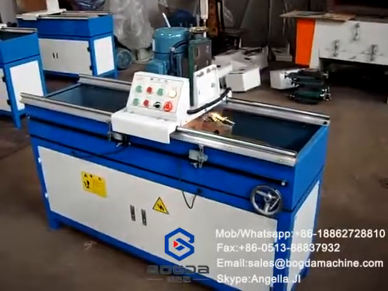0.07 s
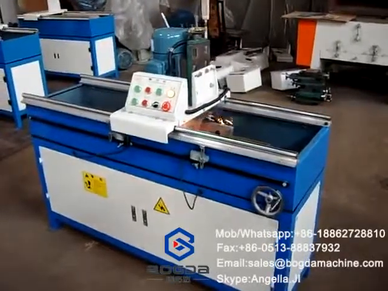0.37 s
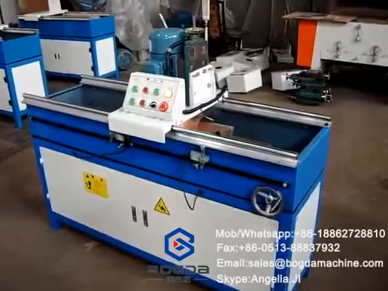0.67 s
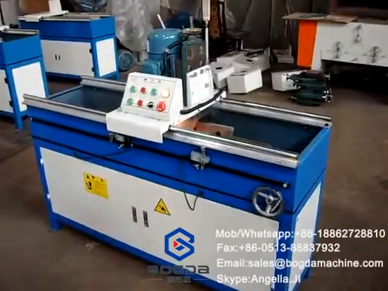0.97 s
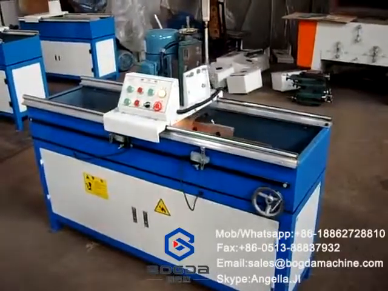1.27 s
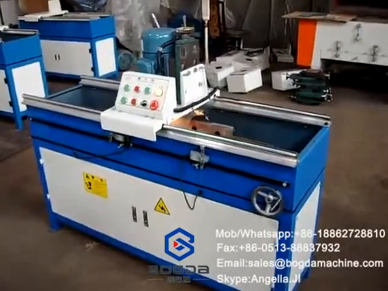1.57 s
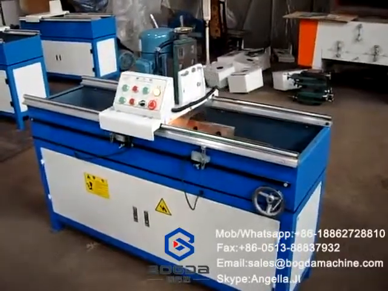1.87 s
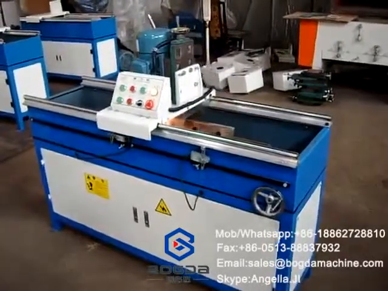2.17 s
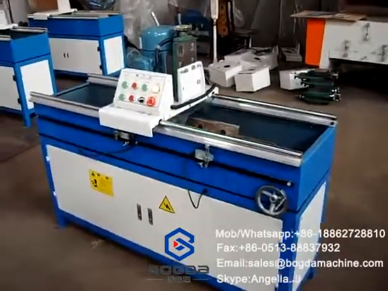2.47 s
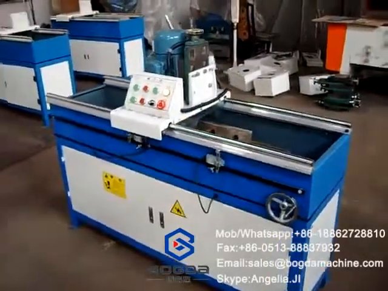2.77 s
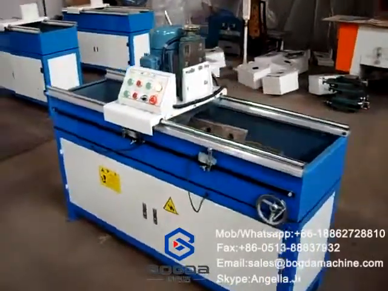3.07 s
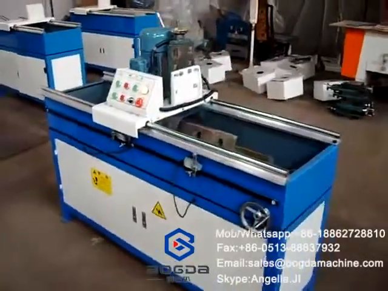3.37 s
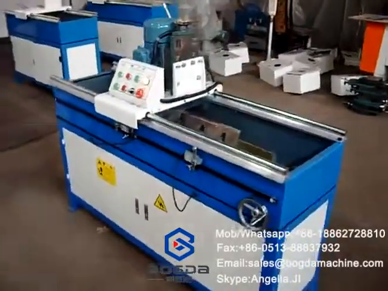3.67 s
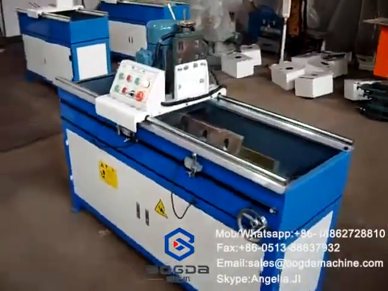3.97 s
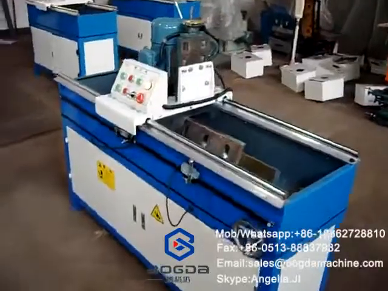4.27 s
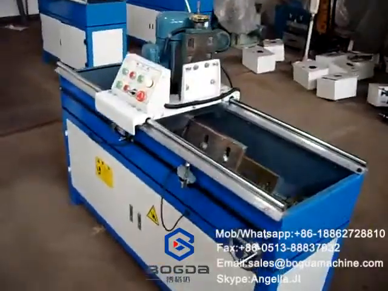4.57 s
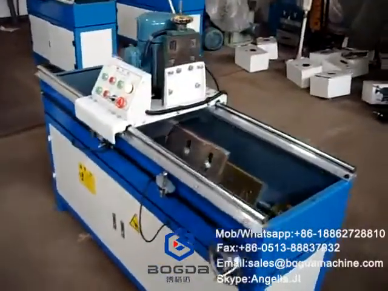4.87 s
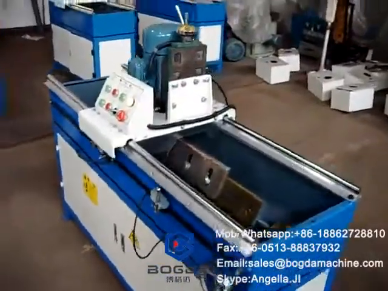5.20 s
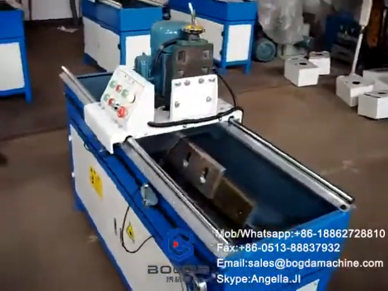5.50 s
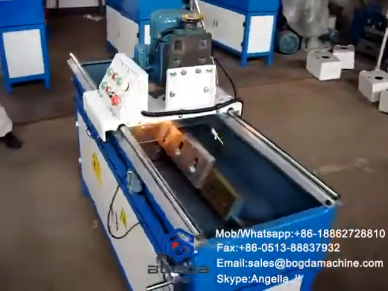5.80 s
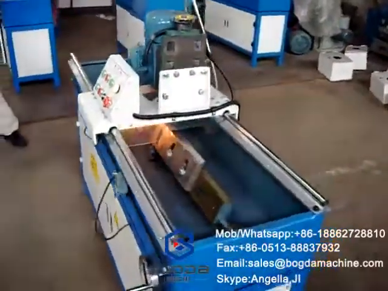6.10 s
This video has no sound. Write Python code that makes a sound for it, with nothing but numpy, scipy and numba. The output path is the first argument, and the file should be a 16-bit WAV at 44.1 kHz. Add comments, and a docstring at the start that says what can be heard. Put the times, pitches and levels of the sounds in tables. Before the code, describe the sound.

A motorised grinding wheel rubs along a long steel blade with a loud buzzing rasp and a high squeal. The squeal sinks in pitch as the wheel runs off the end. The motor then spins free with a hissing whirr, a bright rattle and irregular metal clacks. Near the end the wheel bites again and the squeal climbs. It is heard from nearby, over a soft workshop rumble.

```python
"""First comes a buzzing rasp with a high squeal: a knife grinder's wheel rubs along a long steel blade.
The same grit comes round on every turn, which makes the buzz, and the wheel chatters, which makes the
squeal. The squeal sinks as the wheel nears the blade's springy end and runs off it. The motor head then
spins free with a hiss, a bright rattle and clacks, until the wheel bites again and the squeal climbs.
The workshop rumbles softly underneath."""
import sys
import numpy as np
from scipy import signal
from scipy.fft import rfft, irfft
from scipy.io import wavfile
from scipy.ndimage import uniform_filter1d, map_coordinates
from numba import njit

SR = 44100
rng = np.random.default_rng(int(sys.argv[2]) if len(sys.argv) > 2 else 0)


def store_wav(level_fs):
    """Save 16-bit WAV to argv[1]."""
    pcm = np.round(np.clip(np.atleast_2d(level_fs), -1, 1) * 32767)
    wavfile.write(sys.argv[1], SR, pcm.T.astype(np.int16))


N = 270774
T = np.arange(N) / SR


def undb(db):
    """Turn decibels into a number to multiply by."""
    return 10 ** (np.asarray(db) / 20)


def unit(x):
    """Scale a signal to an average strength (rms) of 1."""
    return x / np.sqrt(np.mean(x ** 2))


def steady(x, samples):
    """Hold a signal's strength near 1, averaging over this many samples."""
    return x / np.sqrt(uniform_filter1d(x ** 2, size=samples) + 1e-12)


def curve(table):
    """Join (seconds, value) rows with straight lines."""
    return np.interp(T, *np.transpose(table))


def wander(per_s):
    """A smooth random wobble, about 1 in size."""
    hold = int(SR / per_s)
    steps = np.repeat(rng.standard_normal(N // hold + 1), hold)
    return unit(uniform_filter1d(uniform_filter1d(steps, hold), hold)[:N])


def bump(turns, place, width):
    """A smooth push at one place in every turn."""
    return np.exp(-.5 * (((turns - place + .5) % 1 - .5) / width) ** 2)


def colour(x, points, size=4096):
    """Shape a sound's bass and treble to follow (Hz, dB) points."""
    hz, db = np.transpose(points)
    bins_hz = np.arange(size // 2 + 1) * SR / size
    gain = undb(np.interp(np.log(bins_hz + 1), np.log(hz), db))
    # fold the filter so that it never sounds ahead of its input
    cepstrum = irfft(np.log(gain))
    cepstrum[1:size // 2] *= 2
    cepstrum[size // 2 + 1:] = 0
    response = irfft(np.exp(rfft(cepstrum)))
    return unit(signal.fftconvolve(x, response)[:N])


def resonance(x, hz, width):
    """Ring at one pitch; a smaller width rings longer."""
    return signal.lfilter(*signal.iirpeak(hz, hz / width, fs=SR), x)


def ring(x, modes):
    """Shake an object that rings at several pitches."""
    return unit(sum(undb(db) * resonance(x, hz, width) for hz, width, db in modes))


@njit
def moving_resonance(x, hz, width):
    """Let through only a narrow band around a moving pitch."""
    out, band, low = np.empty(len(x)), 0., 0.
    for i in range(len(x)):
        tune = np.tan(np.pi * hz[i] / SR)
        damping = np.pi * width / SR * (1 + tune * tune) / tune
        swing = (band + tune * (x[i] - low)) / (1 + tune * (tune + damping))
        band, low = 2 * swing - band, low + 2 * tune * swing
        out[i] = damping * swing
    return out


# The tone of the room's rumble. Each row: pitch in Hz, level in dB.
RUMBLE_TONE = [(10, -5), (25, 1), (60, -1), (120, 0), (220, -1), (500, -18), (2000, -26)]

def room_rumble(level_db=-47.5):
    """The low, even noise of the workshop."""
    return colour(rng.standard_normal(N), RUMBLE_TONE) * undb(level_db)


def room_echo(x, fade_s, echo_db, size=26000):
    """Concrete walls and floor add a blur of echoes that falls 60 dB in fade_s."""
    tail = rng.standard_normal(size) * undb(-60 * T[:size] / fade_s) * (T[:size] > .005)
    return x + undb(echo_db) * signal.fftconvolve(x, tail / np.linalg.norm(tail))[:N]


# Brief drops in loudness. Each row: start in seconds, depth in dB, then fall, hold and rise in seconds.
DIPS = [(0.4912, 10.5, .002, .005, .26), (2.41, 3, 0.086, 0.075, 0.034), (4.044, 9.5, .035, 0.096, 0.18),
        (4.287, 4.5, 0.044, .18, 0.065)]

def dips_db():
    """The whole sound drops, stays low for a moment and swells back."""
    return -sum(db * np.interp(T, start + np.cumsum([0, fall, hold, rise]), [0, 1, 1, 0])
                for start, db, fall, hold, rise in DIPS)


# The path of the motor head. Each row: time in seconds, place in blade lengths.
TRAVEL = [(0, 0), (2.45, 1), (4.05, 1.65), (5.66, 1), (6.14, .8)]

def wheel_place():
    """Where the wheel is along the blade; above 1 it is past the end."""
    return curve(TRAVEL)


# The wheel's passes, out and back. "Give" is how much the steel yields, from 0 to 1.
# Each row: start and end in seconds, give at the tip, its reach in blade lengths,
# growl in dB, rasp in dB, treble lift of the squeals in dB per octave.
PASSES = [(-.2, 2.42, 1.0, .14, -32.5, -20.5, 0), (5.655, 6.5, .56, .24, -35, -24, 3)]

def contact(late_s=0, meet_s=.063, leave_s=.12):
    """How the wheel meets the steel: touch (0 to 1), give, and this pass's three dB settings."""
    rows = np.array(PASSES)
    current = rows[np.searchsorted(rows[1:, 0], T)]
    start, end, tip_give, reach, growl_db, rasp_db, bright_db = current.T
    touch = np.clip(np.minimum((T - start) / meet_s, 1 - (T - end - late_s) / leave_s), 0, 1)
    from_tip = np.maximum(1 - wheel_place(), 0)
    give = tip_give / (1 + (from_tip / reach) ** 2.6)
    return touch, give, growl_db, rasp_db, bright_db


# The whirr's tone at the machine's side and at its open end. Each row: pitch in Hz, level in dB.
SIDE_WHIRR = [(60, -33), (160, -13.5), (300, -12.5), (420, -8), (800, -5), (1180, -4.5), (1480, -1),
              (1850, -1), (2850, 6.5), (3700, -1), (5200, 2), (6300, -0.5), (8000, 4.5), (9200, -4),
              (10300, -2.5), (11000, -9)]
END_WHIRR = [(60, -25), (160, -11.5), (300, -5.5), (480, -6), (820, -2.5), (1200, -4.5), (1450, 4),
             (1950, 0), (2650, 3), (4100, -1), (4950, 4), (6000, 2.5), (7900, -1), (9200, 2.5),
             (10300, -3.5), (11000, -14)]
# The blend of those two tones. Each row: time in seconds, share of the open end from 0 to 1.
END_SHARE = [(0, 0.9), (3.9, 0.024), (4.7, 0.8), (6.14, 1)]
# How the motor's housing rings. Each row: pitch in Hz, width in Hz, level in dB.
HOUSING_MODES = [(314, 32, -1.5), (1651, 43, 2.5), (2640, 34, -0.5), (2930, 230, -0.5), (7700, 90, 3.5),
                 (8170, 64, -11), (8840, 60, 6), (10100, 65, -16)]

def motor_whirr(level_db=-19.5, grinding_db=-3, bass_db=2.66, treble_db=-1.33):
    """The motor whirrs through its housing, a little softer while the wheel grinds."""
    air = rng.standard_normal(N) * undb(wander(24.97))
    share = curve(END_SHARE)
    rush = (1 - share) * colour(air, SIDE_WHIRR) + share * colour(air, END_WHIRR)
    whirr = unit(rush + undb(-9.5) * ring(rng.standard_normal(N), HOUSING_MODES))
    bass = signal.sosfilt(signal.butter(1, 1500, fs=SR, output="sos"), whirr)
    whirr = bass * undb(bass_db) + (whirr - bass) * undb(treble_db)
    touch = contact()[0]
    return whirr * undb(level_db + grinding_db * touch)


def looseness_db(tip_db=-24, steadied_db=-6, db_per_length=6, return_db=-1, turns_back_s=4.05):
    """The rattle's level: steel steadies the wheel, and the head shakes more the further it overhangs."""
    touch = contact(late_s=.11)[0]  # it takes a moment to shake loose
    overhang = np.maximum(wheel_place() - 1, 0)
    return tip_db + steadied_db * touch + db_per_length * overhang + return_db * (T > turns_back_s)


# The bright tone of loose parts. Each row: pitch in Hz, level in dB.
RATTLE_TONE = [(500, -14), (1400, -8), (2800, 0.5), (4000, -2.5), (6200, -1.5), (7100, 4), (8000, 6.5),
               (8900, 5.5), (9600, -2), (11000, -20)]

def rattle(turns, shaft_hz=27.4, ticks_per_s=1500, tick_s=.0006):
    """Loose parts tick, hardest when the wheel and a slower shaft line up."""
    shake = .29 + bump(turns, .19, .067) + 1.2 * bump(turns, .47, .066)
    shake *= 1 + .45 * np.cos(2 * np.pi * shaft_hz * T)
    ticks = (rng.random(N) < ticks_per_s / SR) * shake * undb(1.5 * wander(12))
    # each tick becomes a tiny burst of noise
    energy = signal.lfilter([1], [1, -np.exp(-1 / (tick_s * SR))], ticks ** 2)
    return colour(np.sqrt(energy) * rng.standard_normal(N), RATTLE_TONE) * undb(looseness_db())


def chance_clacks(turns, chance=.16, over_rattle_db=4, spread_db=2.5, dull_db=-9):
    """On some turns a loose part strikes half way round; gives rows like those of LOUD_CLACKS."""
    halfway = np.flatnonzero(np.diff(np.floor(turns - .5)))
    levels = looseness_db()[halfway] + over_rattle_db + spread_db * rng.standard_normal(len(halfway))
    strikes = rng.random(len(halfway)) < chance
    return [(start, db, dull_db) for start, db in zip(T[halfway][strikes], levels[strikes])]


# The loudest knocks. Each row: start in seconds, level in dB, dull part against bright part in dB.
LOUD_CLACKS = [(0.4887, -10, -9), (2.56, -9.5, -19), (2.625, -11, -20), (2.791, -11, -15),
               (2.962, -13, -19), (3.023, -13, -18), (3.326, -10.5, -14), (3.465, -16, -1),
               (3.505, -9.5, -11), (3.624, -9.5, -17), (4.011, -19, -3), (4.03, -6, -21), (4.268, -19, -9),
               (4.281, -12, -16), (4.66, -14.5, -7), (4.804, -11, -12), (4.926, -18, 3), (4.962, -18, 1)]

def clacks(turns, rise_s=.00055, decay_s=.0087, size=3000):
    """Steel knocks on steel: a short bright burst with a duller body."""
    bright, dull = np.zeros(N + size), np.zeros(N + size)
    shape = np.exp(-T[:size] / decay_s) * (1 - np.exp(-T[:size] / rise_s))
    for start, db, dull_db in list(LOUD_CLACKS) + chance_clacks(turns):
        i = int(start * SR)
        bright[i:i + size] += undb(db) * shape
        dull[i:i + size] += undb(db + dull_db) * shape
    snap = bright[:N] * colour(rng.standard_normal(N), RATTLE_TONE)
    body = dull[:N] * colour(rng.standard_normal(N), RASP_TONE)
    return snap + body


# Short squeaks of the wheel. Each row: start in seconds, length in seconds, level in dB.
SQUEAKS = [(.098, .012, -23), (.139, .022, -22), (.389, .028, -23), (1.405, .014, -22)]

def squeaks(hz=5540, flutter_hz=90):
    """Now and then a grain catches and sings for a moment."""
    swell = sum(undb(db) * np.exp(-(2 * (T - start) / length - 1) ** 2) for start, length, db in SQUEAKS)
    pitch = hz + flutter_hz * wander(450)
    return swell * unit(np.sin(2 * np.pi * np.cumsum(pitch) / SR))


# How the blade's free end rings. Each row: pitch in Hz, width in Hz, level in dB.
TIP_MODES = [(2540, 51, 6), (2670, 52, -15), (2846, 64, -17), (3480, 85, -12), (9200, 33, 3), (9800, 66, 0)]

def bites(start_s=5.662, gap_s=.0208, rise_s=.0037, count=6, level_db=-9):
    """The returning wheel hits the blade's end about once a turn, each blow weaker than the last."""
    ages = (np.maximum(T - start_s - k * gap_s, 0) / rise_s for k in range(count))
    blows = sum(age * np.exp(1 - age) / (k + 1) ** .76 for k, age in enumerate(ages))
    return undb(level_db) * blows * steady(ring(rng.standard_normal(N), TIP_MODES), 400)


def grit(turns, wear_s, fresh_db, size=900):
    """The same grains pass every turn; they wear into new ones, and some break off at random."""
    age = T / wear_s
    faces = irfft(np.exp(2j * np.pi * rng.random((256, size // 2 + 1))))  # each row is a rough wheel face
    place = (turns % 1) * size
    old, new = (map_coordinates(faces, [np.floor(age) + k, place], order=1, mode="grid-wrap")
                for k in (0, 1))
    worn = (age % 1) * np.pi / 2
    return unit(old * np.cos(worn) + new * np.sin(worn)) + undb(fresh_db) * rng.standard_normal(N)


# Raised patches on the wheel. Each row: place in the turn from 0 to 1, width in turns, push in dB.
HIGH_PATCHES = [(.31, .06, -2), (.47, .07, 0), (.69, .06, -7)]

def pressure(turns):
    """The raised patches press on the steel one after another."""
    return unit(sum(undb(db) * bump(turns, place, width) for place, width, db in HIGH_PATCHES) + .13)


def spots_db(spots):
    """The level swells and sinks as the wheel passes lively and dead stretches of the blade."""
    place = wheel_place()
    return sum(db * np.exp(-.5 * ((place - at) / reach) ** 2) for at, reach, db in spots)


def ring_along(x, modes, reach=.19, floor_db=-10, step=100):
    """Each pitch of a part rings most when the wheel passes its liveliest place."""
    place = wheel_place()[::step]
    out = 0
    for hz, width, db, best in modes:
        share = undb(floor_db) + np.exp(-.5 * ((place - best) / reach) ** 2)
        out = out + undb(db) * np.repeat(share, step)[:N] * resonance(x, hz, width)
    return steady(out, 30000)


# How the machine's bed (its base) rings.
# Each row: pitch in Hz, width in Hz, level in dB, liveliest place in blade lengths.
BED_MODES = [(191, 15, -12, 0.4), (291, 4.7, -5.5, 0.43), (379, 51, -8.5, 0.13), (492, 13, -7, 0.68),
             (633, 30, -1, 0.2), (708, 110, 2.5, 0.092), (770, 60, -6, 0.72), (835, 73, 1, 0.15),
             (977, 73, -6.5, 0.086), (1140, 190, -13, 0.69), (1320, 150, -9.5, 0.46)]
# Where the growl swells. Each row: place and reach in blade lengths, lift in dB.
GROWL_SPOTS = [(.02, 0.052, 4.5), (.32, 0.11, 4.8)]

def bed_growl(turns):
    """Grit shakes the machine's bed, with one stronger shove every turn."""
    shake = grit(turns, wear_s=.894, fresh_db=-8.5) * (.45 + bump(turns, .79, .061))
    return ring_along(shake, BED_MODES) * undb(spots_db(GROWL_SPOTS))


# The tone of scraped steel. Each row: pitch in Hz, level in dB.
RASP_TONE = [(300, -13.5), (900, -3.5), (1400, -7), (2000, 2), (2300, -6.5), (2700, -0.5), (3200, -10.5),
             (4500, 0.5), (6500, -1), (7400, -3), (8700, 0), (9500, -10), (10300, -4), (11000, -17)]
# How the blade's clamp rings.
# Each row: pitch in Hz, width in Hz, level in dB, liveliest place in blade lengths.
CLAMP_MODES = [(1380, 29, -1, 0.51), (1460, 51, -0.5, 0.059), (2000, 150, -7, 0.69), (2410, 12, 3, .05),
               (2870, 35, 6.5, 0.23), (2910, 47, 3.5, 0.84), (3800, 10, -20.5, 1), (4037, 44, 11.5, 0.65),
               (5430, 56, 2, 0.11), (5940, 40, 10, 1), (6100, 170, -7, .05), (8100, 170, 2, 0.99),
               (9370, 44, 11, 0.98)]

def rasp(turns, scrape):
    """Grit scratches the blade and rings the clamp that holds it."""
    rubbed = scrape * (1 + .41 * pressure(turns))
    return unit(colour(rubbed, RASP_TONE) + undb(1.5) * ring_along(rubbed, CLAMP_MODES))


# How the blade rings, wherever it is touched. Each row: pitch in Hz, width in Hz, level in dB.
BLADE_MODES = [(2660, 50, -4), (2790, 60, -3), (2910, 60, -3), (3030, 50, -4), (3187, 60, 0), (3381, 50, 0),
               (3455, 50, -1), (3615, 45, -1), (3690, 35, 6), (3828, 40, 0), (3945, 40, -4), (4062, 60, -1),
               (5534, 60, -4), (5775, 45, 0), (5845, 45, 4), (6090, 40, -5), (6223, 50, 3), (6440, 70, -2),
               (6565, 70, 0), (6750, 90, -5), (9225, 45, 3), (9325, 45, 1), (9595, 55, 0), (9745, 70, -1),
               (9830, 60, -4)]
# The low, middle and high squeal.
# Each row: pitch on firm steel in Hz, drop at full give in Hz, level in dB, lift at full give in dB.
SQUEALS = [(4008, 1050, -23, .5), (6556, 720, -28.5, 7), (9713, 450, -33.5, 11.5)]
# Where each squeal swells or sinks, one list each. Each row: place and reach in blade lengths, lift in dB.
SQUEAL_SPOTS = [
    [(.6, 0.078, 2.5), (.75, 0.028, -2), (.9, 0.028, 1)],
    [(.46, 0.037, 5), (.72, 0.14, 6.5)],
    [(.45, .05, 10.5), (.77, .09, 2)],
]

def squeal(turns, scrape, which, width_hz, swing_hz, flutter_hz, pure_db, direct_db, lag_turns):
    """The wheel chatters and rings the blade; pressing raises the pitch, yielding steel lowers it."""
    _, give, _, _, bright_db = contact()
    firm_hz, drop_hz, firm_db, lift_db = SQUEALS[which]
    hz = firm_hz - drop_hz * give
    octaves_up = np.log2(firm_hz / SQUEALS[0][0])
    db = firm_db + lift_db * give + spots_db(SQUEAL_SPOTS[which]) + bright_db * octaves_up
    push = pressure(turns - lag_turns)
    loose = np.minimum(give / .4, 1)  # the pitch flutters near the free end
    pitch = hz + swing_hz * (push - 1.4) + flutter_hz * loose * wander(800)
    rough = unit(moving_resonance(push * scrape, pitch, float(width_hz)))
    pure = push * np.sin(2 * np.pi * np.cumsum(pitch) / SR)
    chatter = rough + undb(pure_db) * pure
    near_modes = [mode for mode in BLADE_MODES if hz.min() - 500 < mode[0] < hz.max() + 500]
    tone = ring(chatter, near_modes) + undb(direct_db) * unit(chatter)
    # chatter feeds itself and settles at an even strength over a few turns
    return steady(tone, 2000) * undb(db + wander(25))


def grinding(turns):
    """While the wheel touches the steel, its grit makes a growl, a rasp and three squeals."""
    touch, give, growl_db, rasp_db, _ = contact()
    growl = bed_growl(turns) * undb(growl_db)
    scrape = grit(turns, wear_s=.595, fresh_db=-6)
    scratch = rasp(turns, scrape) * undb(rasp_db - 2.5 * give)  # yielding steel rasps less
    low = squeal(turns, scrape, which=0, width_hz=220, swing_hz=135, flutter_hz=210,
                 pure_db=1, direct_db=-3, lag_turns=0)
    middle = squeal(turns, scrape, which=1, width_hz=180, swing_hz=50, flutter_hz=221.8,
                    pure_db=-1.5, direct_db=-19, lag_turns=.365)
    high = squeal(turns, scrape, which=2, width_hz=24, swing_hz=27.2, flutter_hz=168,
                  pure_db=-3, direct_db=-40, lag_turns=.092)
    return touch * (growl + scratch + low + middle + high)


# The wheel's speed, lower while it grinds. Each row: time in seconds, turns per second.
WHEEL_SPEED = [(0, 48.04), (1.2, 48.36), (2, 48.88), (2.3, 49.2), (2.6, 49.9), (5.66, 49.95), (5.9, 48.9),
               (6.2, 48.5)]

def scene():
    """One spinning wheel drives the grinding and the rattle, over the rumble of the room."""
    turns = np.cumsum(curve(WHEEL_SPEED)) / SR
    machine = grinding(turns) + squeaks() + bites() + motor_whirr() + rattle(turns) + clacks(turns)
    mix = room_echo(machine, fade_s=.14, echo_db=-10) + room_rumble()
    return (mix * undb(dips_db()))[None]


def record(dry):
    """The microphone rounds off the loudest peaks and cuts the treble above 11100 Hz."""
    rounded = np.tanh(1.036 * dry) / 1.068
    return signal.sosfilt(signal.ellip(12, .1, 80, 11100, fs=SR, output="sos"), rounded)


dry = scene()
out = record(dry)
store_wav(out)
```